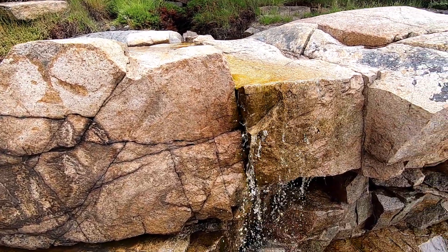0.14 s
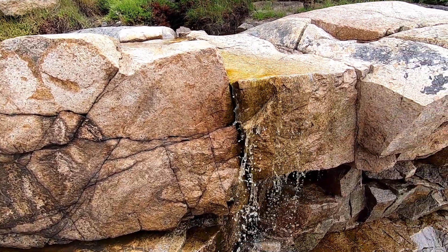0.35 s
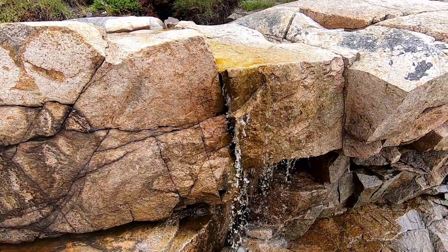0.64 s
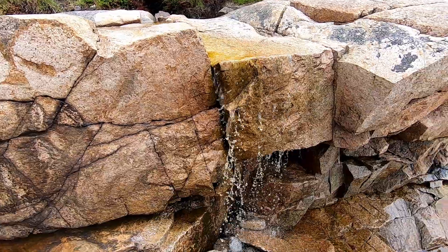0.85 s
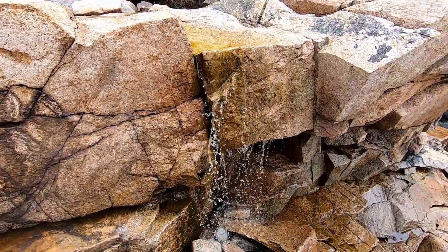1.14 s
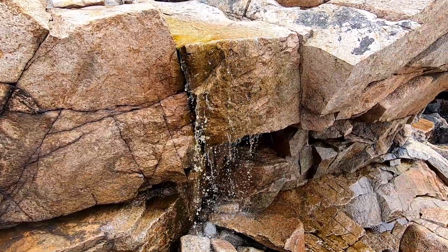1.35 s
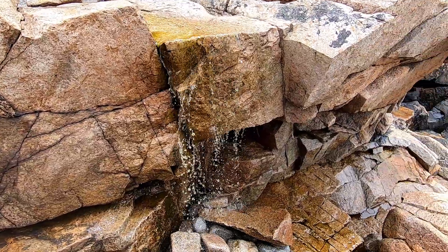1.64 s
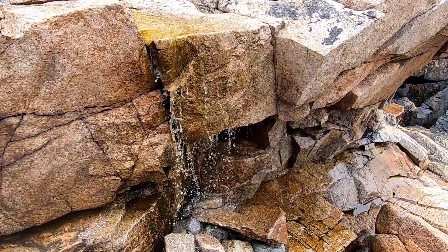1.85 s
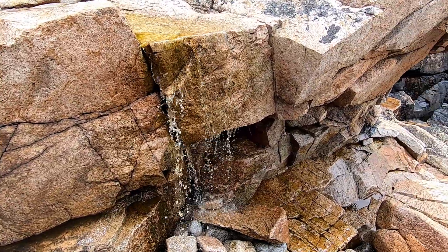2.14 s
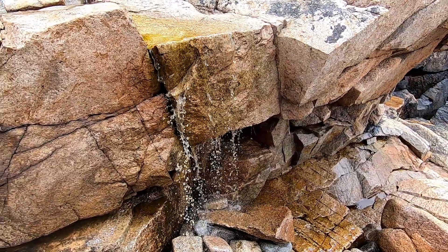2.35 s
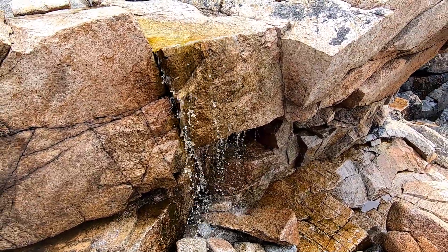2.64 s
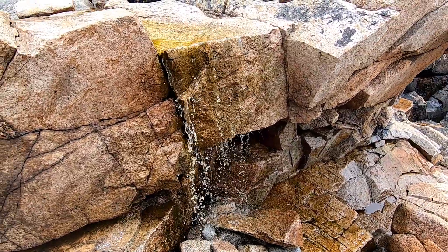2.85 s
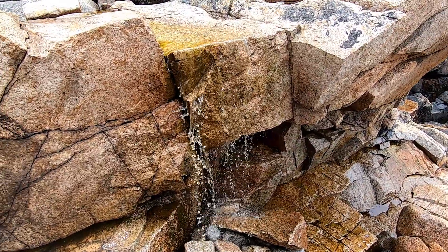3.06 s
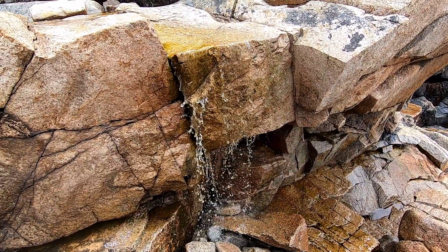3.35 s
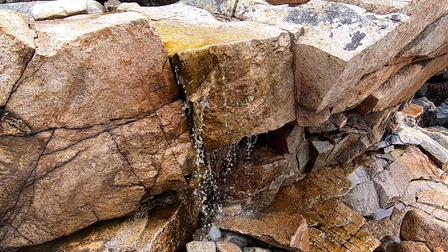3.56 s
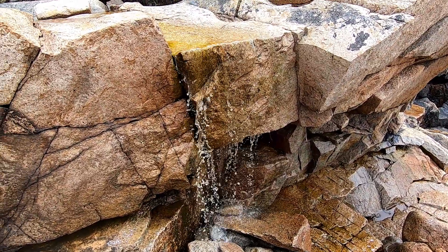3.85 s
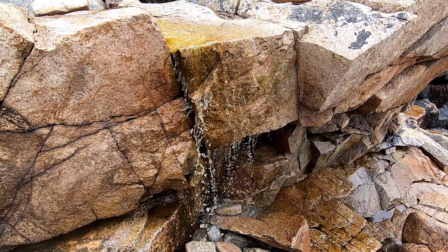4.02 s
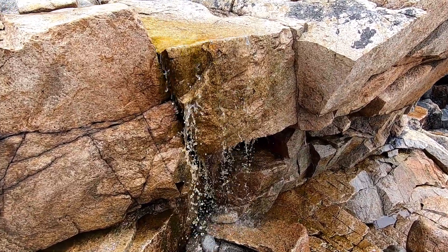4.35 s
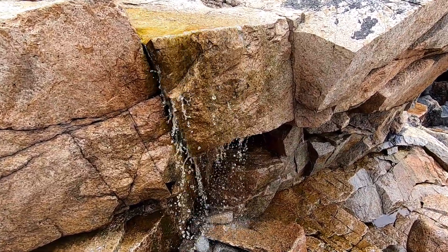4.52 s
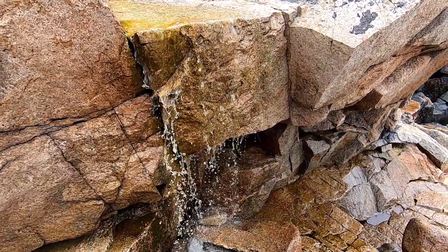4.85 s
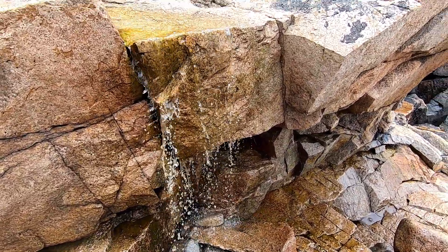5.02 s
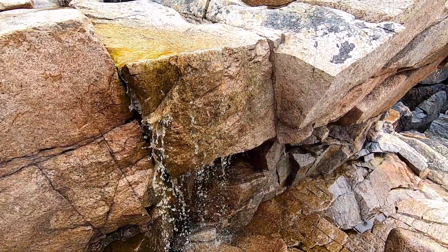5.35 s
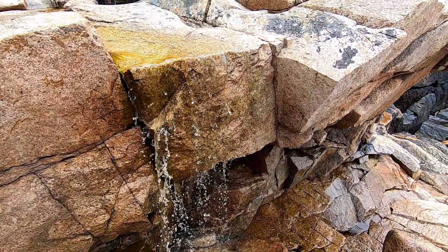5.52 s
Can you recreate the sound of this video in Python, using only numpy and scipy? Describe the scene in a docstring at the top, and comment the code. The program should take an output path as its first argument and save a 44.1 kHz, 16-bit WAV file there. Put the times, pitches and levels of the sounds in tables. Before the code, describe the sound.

Close trickling and splashing of a small waterfall on stones, a few soft glugs, gusty wind rumble on the microphone, turning duller and narrower at the end.

```python
"""A thin stream falls from a rock ledge and spatters on wet stones: drops slap, ring and throw spray.
Between them droplets patter steadily, as random trains of decaying bubble tones over a hiss of noise.
A pool between the stones glugs now and then through low bubble resonances, before a soft far-off rush.
Wind rumbles in gusts of filtered noise, mostly on the left of the microphone, and a dull tick sounds once.
Near the end the wind drops, the sound narrows and the treble dulls."""
import sys
import numpy as np
from scipy import signal
from scipy.io import wavfile

SR = 44100
rng = np.random.default_rng(int(sys.argv[2]) if len(sys.argv) > 2 else 0)


def unload_wav(signal):
    """Save mono or channel-first audio to the path in sys.argv[1] as 16-bit WAV at rate SR, clipped to [-1, 1]."""
    wavfile.write(
        sys.argv[1],
        SR,
        np.round(np.clip(np.atleast_2d(signal).T, -1, 1) * 32767).astype(np.int16),
    )


N = 250643
TIME = np.arange(N) / SR  # seconds


def gain_of(db):
    """Logarithmic level: 20 dB is a factor of ten in amplitude."""
    return 10 ** (np.asarray(db) / 20)


def evened(x):
    """Normalization of power: scales to rms 1."""
    return x / np.sqrt(np.mean(x ** 2) + 1e-20)


def curve(rows, axis=1):
    """Linear interpolation: one column of a table of times, at every sample."""
    rows = np.asarray(rows)
    return np.interp(TIME, rows[:, 0], rows[:, axis])


def add(mix, s, sound):
    """Superposition: adds a sound into the mix at s seconds."""
    part = mix[..., max(round(s * SR), 0):][..., :sound.shape[-1]]
    part += sound[..., :part.shape[-1]]


def colour(x, points, size=4096):
    """Minimum-phase filtering to a (Hz, dB) spectrum: being causal, it keeps the sharp fronts of clicks."""
    hz, db = np.transpose(points)
    bin_hz = abs(np.fft.fftfreq(size, 1 / SR))
    log_gain = np.log(gain_of(np.interp(np.log(bin_hz + 1), np.log(hz + 1), db)))
    # the Hilbert transform of the log gain gives the phase of least delay
    spectrum = np.exp(np.conj(signal.hilbert(log_gain)))
    taps = np.fft.ifft(spectrum).real[:size // 2]
    return signal.oaconvolve(x, taps.reshape((1,) * (x.ndim - 1) + (-1,)), axes=-1)[..., :N]


def band(x, low_hz, high_hz, order=2):
    """Band-pass filtering: a causal Butterworth response."""
    edges = [min(low_hz, high_hz * .9), min(high_hz, SR * .49)]
    return signal.lfilter(*signal.butter(order, edges, "band", fs=SR), x)


def sized(x, db, seconds):
    """Equal energy: gives a short sound the energy of that level held for that time."""
    energy = np.sum(x ** 2, -1, keepdims=True)
    return x * gain_of(db) * np.sqrt(seconds * SR / (energy + 1e-20))


def impacts(size, per_s, spread_db):
    """Random arrivals: two trains of clicks of either sign, mostly small, a few large."""
    strength = gain_of(spread_db * np.minimum(rng.exponential(1, (2, size)), 4))
    sign = rng.choice([-1, 1], (2, size))
    arrives = rng.random((2, size)) < per_s / SR
    return strength * sign * arrives


def bubble(t, hz, t60, rise):
    """Bubble resonance: swells within one cycle, rings, and rises in pitch as it nears the surface."""
    envelope = (1 - np.exp(-2 * t * hz)) * gain_of(-60 * t / t60)
    stretched_time = t + rise * t * np.minimum(t / t60, 1) / 2
    return envelope * np.sin(2 * np.pi * hz * stretched_time)


def pings(low_hz, high_hz, per_s, spread_db, cycles, count=48):
    """Ensemble of resonators struck at random: each plip keeps its pitch and cycles; equal power per Hz."""
    t, out = np.arange(1500) / SR, np.zeros((2, N))
    places = (np.arange(count) + rng.random(count)) / count
    for hz in low_hz * (high_hz / low_hz) ** places:
        plip = evened(bubble(t, hz, cycles / hz, rise=0.34)) * np.sqrt(hz)
        clicks = impacts(N, per_s / count, spread_db)
        out += signal.oaconvolve(clicks, plip[None], axes=1)[:, :N]
    return out


# The patter between the separate drops. Each row: time in seconds, level in dB that scales the sum of layers.
PATTER_LEVEL = [(0.0, -35), (3.2, -35), (4.5, -35.5), (5.2, -34.5), (5.68, -32)]
# Spectral shaping of the patter. Each row: frequency in Hz, relative level in dB.
PATTER_SPECTRUM = [(700, -13.5), (1200, -6.5), (1700, -8), (2300, -4.5), (2900, 0), (3800, 2.5), (5000, -1),
                   (6300, -4.5), (8000, -6), (9400, -8.5), (10500, -15), (11500, -19), (13500, -16),
                   (15000, -24)]
CLUMPS_DB = 2.0  # rms swell of the patter in clumps


def patter(drops_db=-3.0, fine_db=-7, bubbles_db=-6.0, mist_db=-6.5):
    """Summed random impacts: droplets land in clumps and bubbles ping in the water film, over hissing mist."""
    swell = evened(band(rng.standard_normal(N), 6, 45))
    clumps = gain_of(CLUMPS_DB * swell)
    drops = pings(1300, 5500, per_s=900, spread_db=3.2, cycles=15) * clumps
    fine = pings(5460, 11200, per_s=2500, spread_db=1.5, cycles=10.2) * clumps
    bubbles = pings(1405, 7156, per_s=300, spread_db=3.5, cycles=102) * np.sqrt(clumps)
    mist = rng.standard_normal((2, N))
    layers = (drops, drops_db), (fine, fine_db), (bubbles, bubbles_db), (mist, mist_db)
    mixed = sum(gain_of(db) * evened(colour(x, PATTER_SPECTRUM)) for x, db in layers)
    return gain_of(curve(PATTER_LEVEL)) * mixed


# Far-off rush of air and water. Each row: time in seconds, level in dB before the common level_db is added.
RUSH_LEVEL = [(0.0, -48.5), (0.52, -50), (1.33, -47.5), (2.15, -49.5), (2.77, -51), (3.59, -49), (4.3, -47),
              (5.09, -44.5), (5.68, -42.5)]
# Spectral shaping of the rush. Each row: frequency in Hz, relative level in dB.
RUSH_SPECTRUM = [(100, 1), (250, 3), (450, -7), (750, -3.5), (1100, -6.5), (2000, -9), (4000, -32.5),
                 (8000, -62)]


def rush(level_db=2):
    """Noise with a falling spectrum: a soft distant wash with faint burbling in it."""
    wash = evened(rng.standard_normal((2, N)))
    burble = evened(pings(276.7, 1515, per_s=130, spread_db=2, cycles=24.6, count=16))
    source = evened(colour(wash + 0.19 * burble, RUSH_SPECTRUM))
    return gain_of(curve(RUSH_LEVEL) + level_db) * source


# The breeze on the microphone's two ports. Each row: time in seconds, left level in dB, right level in dB.
BREEZE_LEVEL = [(0.0, -49.5, -48.5), (0.7, -37, -41), (1.7, -42, -47.5), (2.1, -34.5, -46),
                (3.4, -33, -37.5), (3.85, -34.5, -40.5), (4.3, -24.5, -37), (4.95, -31, -38),
                (5.35, -45, -50), (5.68, -40.5, -41.5)]
# Gusts that swell and die on top of the breeze.
# Each row: peak time in seconds, whole length in seconds, left level in dB, right level in dB.
GUST_EVENTS = [(0.614, 0.098, -39, -38), (1.397, 0.23, -34, -42), (2.15, 0.3, -32, -52),
               (2.732, 0.27, -34, -54), (2.894, 0.12, -48, -32), (3.07, 0.13, -25.5, -45),
               (3.53, 0.31, -28.5, -41), (3.68, 0.062, -33, -28), (4.025, 0.13, -29, -28.5),
               (4.224, 0.14, -17, -30), (4.437, 0.22, -20, -33), (4.794, 0.064, -23, -22.5),
               (4.876, 0.13, -21, -31)]


def wind_strength():
    """Addition of powers: every gust adds a smooth hump to the breeze; gives the amplitude at each port."""
    power = gain_of([curve(BREEZE_LEVEL), curve(BREEZE_LEVEL, axis=2)]) ** 2
    for s, length, left_db, right_db in GUST_EVENTS:
        hump = np.cos(np.pi * np.clip((TIME - s) / length, -.5, .5))
        power += (gain_of([[left_db], [right_db]]) * hump) ** 2
    return np.sqrt(power)


# Spectral shaping of the wind. Each row: frequency in Hz, relative level in dB.
WIND_SPECTRUM = [(10, -31), (25, -3.5), (45, 1.5), (80, 0.5), (120, -3), (180, -14.5), (280, -27.5),
                 (500, -33.5), (1200, -65), (4000, -86)]


def wind(level_db=0.0, lumps_db=2.5, rough_db=2, deep_hz=55, deep_share=0.61):
    """Turbulent pressure: eddies hit each port on their own, and become one as the sound narrows."""
    eddies = evened(colour(rng.standard_normal((2, N)), WIND_SPECTRUM, size=16384))
    lumps = evened(band(rng.standard_normal((2, N)), 5.25, 16.7))
    eddies *= gain_of(lumps_db * lumps)
    strength = wind_strength()
    speed = strength / strength.max()
    # strong gusts shed more small eddies and fewer deep ones
    deep = signal.sosfiltfilt(signal.butter(2, deep_hz, fs=SR, output="sos"), eddies)
    small = gain_of(rough_db) * band(eddies, 134, 320)
    eddies += speed * (small - min(deep_share, 1) * deep)
    apart = np.clip(curve(CLOSING_SOUND), 0, 1)
    # the squared weights sum to one, so the power stays even
    eddies[1] = apart * eddies[1] + np.sqrt(1 - apart ** 2) * eddies[0]
    return eddies * strength * gain_of(level_db)


def spray(t, hz, delay_cycles=25, cycles=20, top_hz=5000, fine_db=-5, count=5):
    """Secondary impacts: thrown droplets land later for a big drop, as higher plips in a fine crackle."""
    when, pitch, size = rng.random((3, 2, count, 1))
    delay = delay_cycles / hz
    age = np.maximum(t - .003 + delay * np.log(1 - when), 0)  # time since each droplet landed
    pitches = hz * (top_hz / hz) ** pitch
    plips = (gain_of(-10 * size) * bubble(age, pitches, cycles / pitches, rise=0.039)).sum(1)
    crackle = impacts(len(t), per_s=5900, spread_db=1) * np.exp(-t / delay) * (t > .002)
    fine = band(crackle, hz * 0.73, top_hz, order=3)
    return evened(plips) + gain_of(fine_db) * evened(fine)


# ring and spray, in dB re the slap: bigger drops ring more clearly, and hard slaps lose less as spray
RING_DB, RING_DB_PER_OCTAVE, SPRAY_DB, SPRAY_DB_PER_DB = -4, -4, -2, -0.03
SLAP_S = 0.0042  # the time over which a drop's levels count
# typical middling drop: level, pitch and treble snap re the slap
DROP_DB, DROP_HZ, DROP_SNAP_DB = -29.5, 3170, -8.5


def splat(db, hz, snap_db, top_hz=4500, ring_cycles=24, snap_s=0.0047, snap_top_hz=10000):
    """Impact and resonance: a drop slaps wet stone and traps a bubble; bigger ones sound lower and longer."""
    t = np.arange(3000) / SR
    ring_db = RING_DB + RING_DB_PER_OCTAVE * np.log2(hz / DROP_HZ)
    spray_db = SPRAY_DB + SPRAY_DB_PER_DB * (db - DROP_DB)
    slap, snap = rng.standard_normal((2, 2, len(t)))
    slap = evened(band(slap * np.exp(-t * hz / 3), hz * .84, top_hz, order=3))
    ring = evened(bubble(t, hz, ring_cycles / hz, rise=0.21))
    snap = band(snap * np.exp(-t / snap_s), 4750, snap_top_hz, order=4)
    body = sized(slap + gain_of(ring_db) * ring, db, SLAP_S)
    treble = sized(snap, db + snap_db, SLAP_S)
    thrown = sized(spray(t, hz), db + spray_db, SLAP_S)
    return body + treble + thrown


# Drops that stand out, most of them loud. Each row: start in seconds, level in dB,
# pitch in Hz (low for a big drop), treble snap in dB relative to the slap.
CLEAR_DROPS = [(0.068, -25, 2950, -10), (0.1385, -28, 3360, -12), (0.149, -26, 2650, -11),
               (0.2834, -25, 2260, -10), (0.3765, -22.5, 2390, -8), (0.6059, -27.5, 3180, -11),
               (0.7128, -28, 2500, -17), (0.7277, -26, 1940, -10), (1.003, -30, 2990, -6),
               (1.0515, -30, 3160, -20), (1.1735, -29, 3030, -9), (1.2358, -28.5, 2070, -16),
               (1.37, -27.5, 3150, -8), (1.4333, -27.5, 2930, -21), (1.5578, -24.5, 3140, -24),
               (1.583, -26, 2040, -27), (1.6472, -24.5, 2750, -13), (1.9445, -25, 3470, -15),
               (2.0144, -26, 3600, -6), (2.2458, -29, 3600, 2.5), (2.3127, -21, 1760, -26),
               (2.325, -26, 2930, -19), (2.4926, -23, 2440, -24), (2.7177, -24.5, 3190, -16),
               (2.735, -26.5, 3720, -0.5), (2.83, -28.5, 2960, -9), (2.8961, -30, 2320, -13),
               (2.906, -26.5, 3180, -9), (2.9455, -23, 1980, -8), (3.0333, -24.5, 2030, -6.5),
               (3.2317, -29.5, 1860, -6), (3.3229, -22.5, 2060, -22), (3.3815, -25, 2900, -14),
               (3.4872, -27, 2300, -8), (3.6987, -28, 3010, -3.5), (3.744, -29, 2620, -21),
               (4.008, -25, 2770, -20), (4.065, -26.5, 3120, -7.5), (4.2158, -26.5, 1750, -15),
               (4.6059, -26, 3530, -3), (4.6308, -26.5, 3300, -14), (4.7242, -21, 1660, -29),
               (4.75, -30, 3700, -21), (5.0271, -22, 2390, -16), (5.046, -27, 2810, -25),
               (5.0835, -27.5, 2150, -21), (5.1155, -27.5, 3900, -8), (5.267, -27, 2890, -25),
               (5.3116, -28.5, 2350, -14), (5.3292, -24, 3570, -4.5), (5.4683, -23.5, 2770, -9),
               (5.499, -22, 2650, -21), (5.6504, -25, 1540, -11)]
# how far each middling drop strays either way from the typical one
STRAY_DB, STRAY_OCTAVES, STRAY_SNAP_DB = 1, 0.35, 5.5
DROPS_PER_S = 10


def splats():
    """Breakup of a jet: drops that stand out, and middling ones that leave the stream at uneven intervals."""
    out = np.zeros((2, N))
    for s, *drop in CLEAR_DROPS:
        add(out, s, splat(*drop))
    for k in range(int(DROPS_PER_S * N / SR)):
        late, size, pitch, snap = rng.uniform(-1, 1, 4)
        db = DROP_DB + STRAY_DB * size
        hz = DROP_HZ * 2 ** (STRAY_OCTAVES * pitch)
        snap_db = DROP_SNAP_DB + STRAY_SNAP_DB * snap
        add(out, (k + 1 + late) / DROPS_PER_S, splat(db, hz, snap_db))
    return out


# Air pockets closing in the pool. Each row: start in seconds, level in dB, starting pitch in Hz,
# time to decay by 60 dB in seconds.
AIR_POCKETS = [(0.850, -49, 674, 0.04), (1.409, -43.5, 796, 0.02), (1.416, -50, 457, 0.065),
               (1.436, -60, 620, 0.064), (1.534, -49, 325, 0.027), (2.512, -47, 830, 0.042),
               (2.518, -44, 284, 0.041), (2.522, -50, 540, 0.07), (2.565, -48, 670, 0.06),
               (2.694, -45, 810, 0.032), (2.712, -46.5, 657, 0.17), (2.851, -41, 770, 0.071),
               (2.858, -43, 398, 0.023), (4.228, -39.5, 312, 0.13), (4.515, -41, 800, 0.11),
               (4.830, -46, 693, 0.11), (4.957, -36.5, 310, 0.084), (4.960, -61, 540, 0.11),
               (5.051, -43, 654, 0.052), (5.442, -35, 159, 0.25), (5.478, -45, 410, 0.061),
               (5.656, -38.5, 344, 0.2)]


def glugs(slosh_db=1.0, slosh_t60=0.1):
    """Cavity resonance: large air pockets ring low and briefly, with a slosh of noise around them."""
    t, out = np.arange(SR // 5) / SR, np.zeros((2, N))
    for s, db, hz, t60 in AIR_POCKETS:
        fading_noise = rng.standard_normal((2, len(t))) * gain_of(-60 * t / slosh_t60)
        slosh = band(fading_noise, hz * 0.44, hz * 1.5, order=3)
        ring = bubble(t, hz, t60, rise=0.072)
        add(out, s, sized(evened(ring) + gain_of(slosh_db) * evened(slosh), db, 0.041))
    return out


# One dull tick. The row: start in seconds, peak of the click in dB before its ring is added, upper edge in Hz.
DULL_TICK = (4.7795, -13, 1300)


def tick():
    """Low-passed impulse: a click with little treble rings near its upper edge, opposite in the two ears."""
    s, db, edge_hz = DULL_TICK
    click = signal.lfilter(*signal.ellip(8, 1, 60, edge_hz, fs=SR), signal.unit_impulse(2000))
    t, out = np.arange(len(click)) / SR, np.zeros(N)
    ring = bubble(t, edge_hz * 0.96, 0.05, rise=0)
    add(out, s, gain_of(db) * (click / abs(click).max() + 0.48 * ring))
    return np.array([out, -out])


# Where the fall stands. Each row: time in seconds, left minus right in dB at full stereo width.
FALL_PLACE = [(0.0, -4), (1.31, -0.5), (1.77, -0.5), (3.53, -1.5), (4.78, -1.5), (5.68, -2)]
# Stereo spread of the water. Each row: frequency in Hz, gain of side relative to middle in dB.
WATER_SPREAD = [(250, -20), (600, -7.5), (1200, -2), (2200, -9), (3400, -19.5), (4800, -12.5), (6500, -6),
                (8000, -2.5), (9300, 4), (11000, -1), (15000, 1.5)]
# The sound closes in. Each row: time in seconds, stereo width from 0 to 1, treble in dB, bass in dB.
CLOSING_SOUND = [(0, 0.95, 0.5, 2.5), (4.8, 1, 1, -0.5), (5.0, 0.55, -4.5, -3), (5.2, 0.24, -6.5, 3),
                 (5.68, 0.05, -7, -16)]


def scene(low_pan_db=-4.0):
    """Middle and side stereo: the water's two rows are middle and side; rocks scatter the top treble widely."""
    width, out = curve(CLOSING_SOUND), wind() + tick()
    fall, low_water = patter() + splats(), rush() + glugs()
    for water, pan_db in (fall, curve(FALL_PLACE)), (low_water, low_pan_db):
        mid, side = water[0], colour(water[1], WATER_SPREAD) * width
        pan = gain_of(np.array([[.5], [-.5]]) * pan_db * width)
        out += np.array([mid + side, mid - side]) * pan
    return out


EDGE_HZ = 15100  # upper band limit


def record(dry, treble_hz=5300, bass_hz=110):
    """Time-varying filtering: treble and deep bass fall away toward the end; then the band limit."""
    treble_filter = signal.butter(4, [treble_hz, 13500], "band", fs=SR, output="sos")
    treble = signal.sosfiltfilt(treble_filter, dry)
    bass = signal.sosfiltfilt(signal.butter(2, bass_hz, fs=SR, output="sos"), dry)
    treble_change = treble * (gain_of(curve(CLOSING_SOUND, axis=2)) - 1)
    bass_change = bass * (gain_of(curve(CLOSING_SOUND, axis=3)) - 1)
    closed = dry + treble_change + bass_change
    limit = signal.firwin(511, EDGE_HZ, window=("kaiser", 9), fs=SR)
    return signal.oaconvolve(closed, limit[None], "same")


dry = scene()
out = record(dry)
unload_wav(out)
```